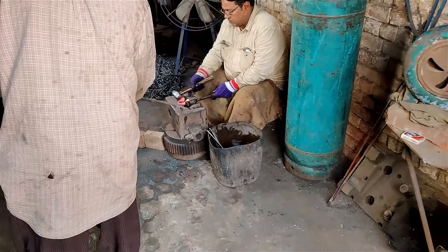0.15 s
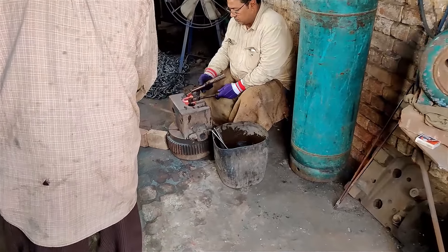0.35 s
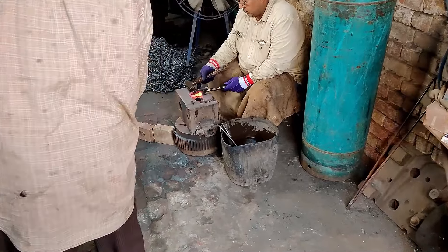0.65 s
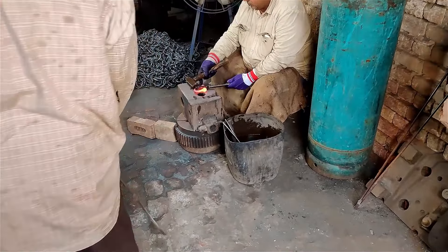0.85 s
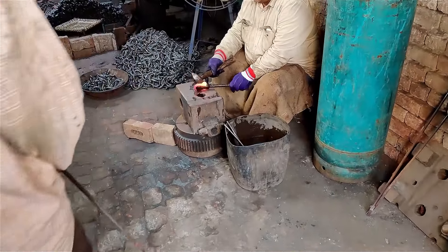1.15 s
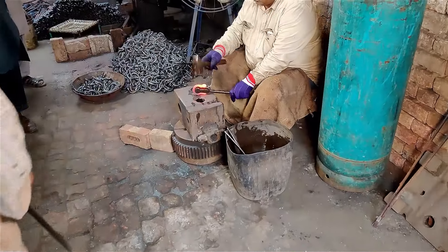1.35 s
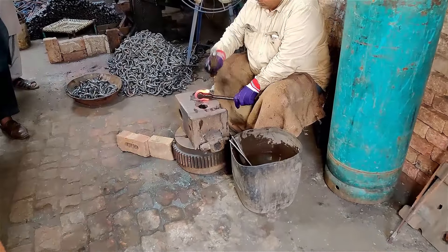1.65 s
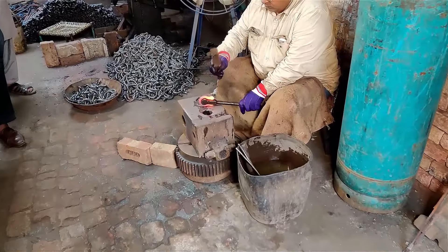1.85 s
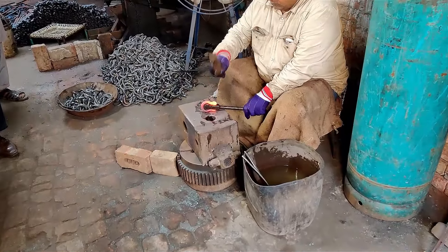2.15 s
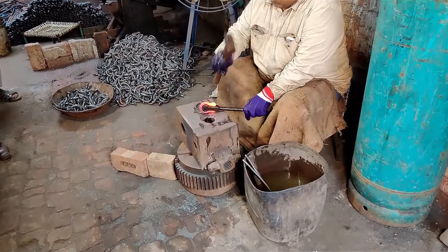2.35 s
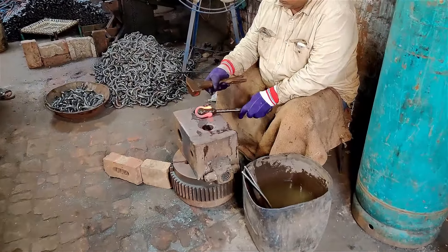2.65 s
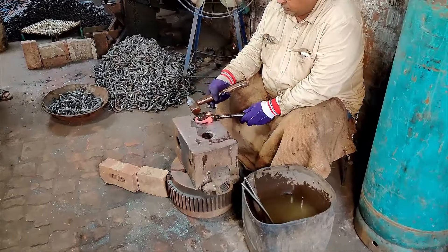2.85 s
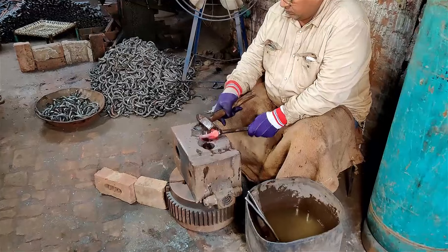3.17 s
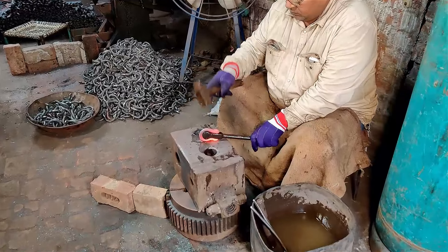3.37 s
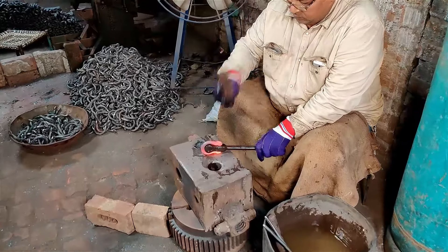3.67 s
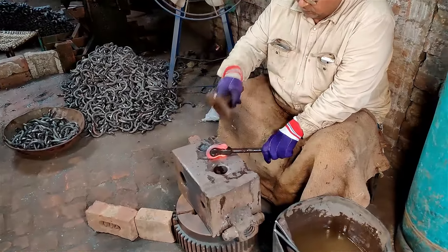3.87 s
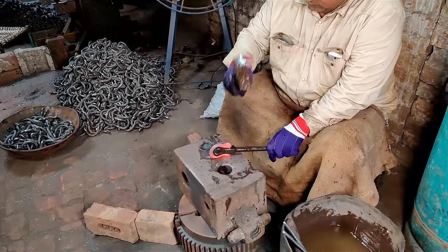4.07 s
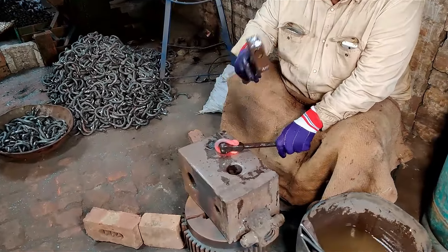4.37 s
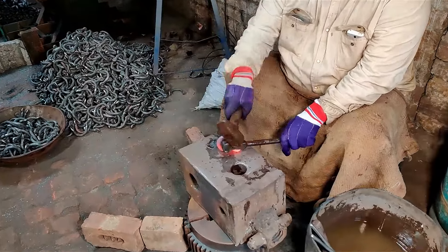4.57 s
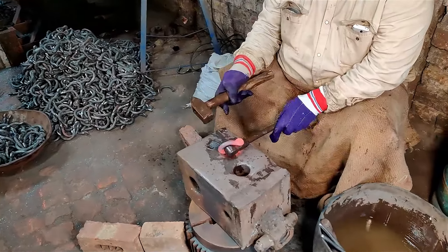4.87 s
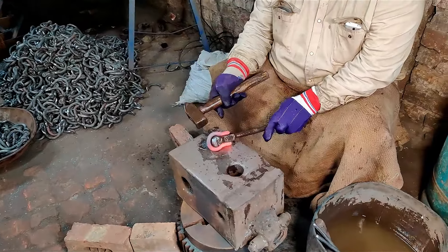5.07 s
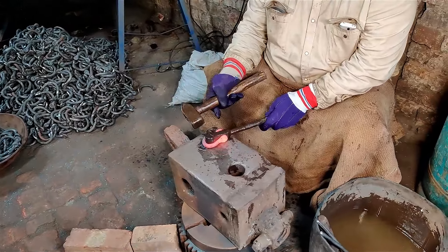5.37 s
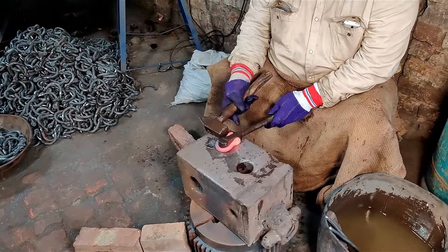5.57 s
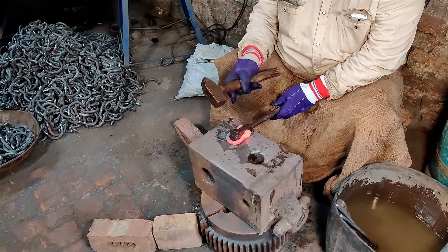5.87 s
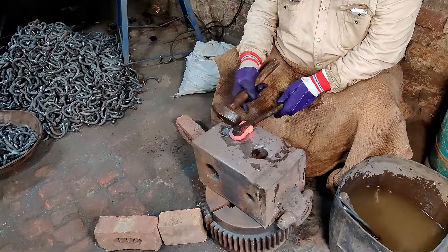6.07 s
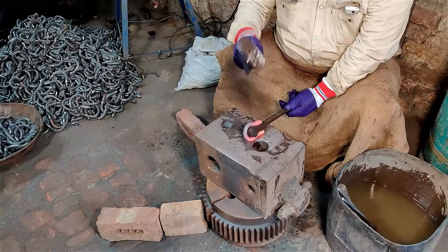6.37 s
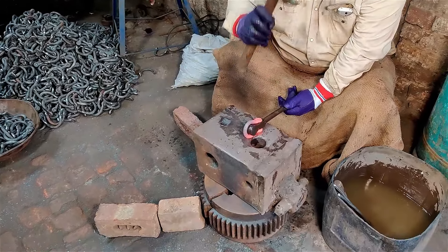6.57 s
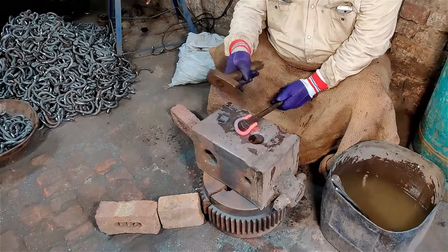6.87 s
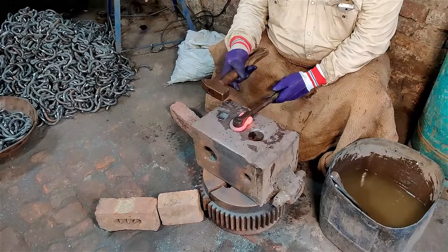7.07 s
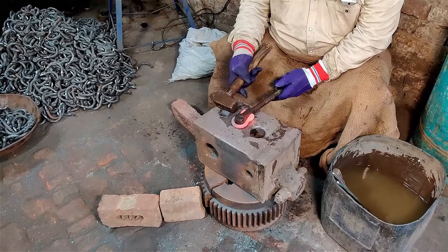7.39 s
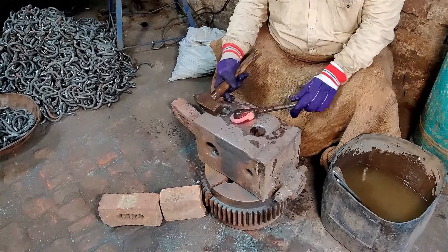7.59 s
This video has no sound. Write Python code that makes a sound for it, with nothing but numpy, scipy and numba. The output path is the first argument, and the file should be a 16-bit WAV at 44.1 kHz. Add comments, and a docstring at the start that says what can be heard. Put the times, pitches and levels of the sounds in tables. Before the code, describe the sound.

A forge blower drones and rushes in a small brick workshop while a smith strikes hot iron on an anvil and others hammer further off.

```python
"""A forge blower and its fire drone in a small brick workshop: noise booms in resonances, rushes and hisses.
The blower adds thin duct tones, a whine and a blade tone. A phone carried past it, through the room's
standing waves, comes to rest at the anvil. A smith hammers a hot link (cracks, knocks, block ring), taps
the block and makes steel squeak; soles scuff. Further off a sledge and a hand hammer strike in turn, heard as
reverberant noise and clinks. The phone ducks on sharp treble bursts and limits the drone's peaks."""
import sys
import numpy as np
from scipy import signal
from scipy.fft import rfft, irfft
from scipy.io import wavfile
from scipy.ndimage import uniform_filter1d, minimum_filter1d, map_coordinates
from numba import njit

SR = 44100
rng = np.random.default_rng(int(sys.argv[2]) if len(sys.argv) > 2 else 0)


def generate_wav(signal):
    """Clip the signal to [-1, 1] and save it as 16-bit WAV at the path in sys.argv[1]."""
    frames = np.transpose(np.atleast_2d(signal))
    scaled = np.clip(frames, -1, 1) * 32767
    pcm = np.round(scaled).astype(np.int16)
    wavfile.write(sys.argv[1], SR, pcm)


N = 340893
T = np.arange(N) / SR
FREQ = np.maximum(np.arange(N // 2 + 1) * SR / N, 1)

# Boom of forge and room, before FORGE_GAIN_DB:
# (frequency [Hz], width [Hz], level at the antinode [dB], antinode position along the path [m])
BOOM_MODES = [(47.5, 12.7, -26.5, 1.45), (67.4, 15, -28, 0.95), (84.6, 10.2, -26.5, 1.8),
              (114.8, 15.5, -29, 1.1), (140.15, 19.9, -18, 0.44), (164.4, 26, -19.5, 0.85),
              (187.1, 29, -22.5, 0.83), (205.34, 15.3, -18.5, 0.12), (226.9, 53, -24, 0.8),
              (270.8, 60, -28.5, 0.2), (324.4, 92, -31.5, 0.31)]
# Spectrum of the air and flame rush: (frequency [Hz], relative density [dB])
RUSH_SPECTRUM = [(240, -25.5), (400, -9), (470, -10.5), (600, -17), (900, -15.5), (1130, -21.5),
                 (1550, -25), (2300, -30), (3200, -34), (5000, -38.5), (7200, -40), (9000, -51),
                 (14000, -55.5), (16000, -69)]
# Resonances of duct and casing: (frequency [Hz], width [Hz], relative level [dB])
DUCT_MODES = [(738.5, 106, -0.5), (837, 104, -6.5), (1095, 79, -15.5)]
# Thin tones in the duct: (frequency [Hz], level relative to the flow [dB])
DUCT_TONE_LEVELS = [(698, -10.5), (742, -9.5), (795, -10), (850, -12)]
# Strength of the air flow: (time [s], level [dB])
FLOW_LEVEL = [(0, -35), (.42, -33), (.7, -34.5), (1.25, -35), (1.5, -34), (2.2, -37.5), (2.75, -33),
              (3.5, -37), (4.1, -35.5), (4.85, -34), (5.2, -36), (7.73, -36.5)]
# Whine of the duct: (time [s], level [dB])
WHINE_LEVEL = [(0, -51), (1.4, -38), (1.8, -42), (2.5, -34), (3.6, -46), (4.8, -41), (7.73, -39)]
# Blade tone, swelling and fading as the phone passes the blower: (time [s], level [dB])
BLADE_LEVEL = [(0, -33), (.5, -26), (.68, -30), (1, -24), (1.2, -26.5), (1.42, -20.5), (1.57, -24.5),
               (1.68, -21), (1.86, -26.5), (2.07, -23), (2.2, -33), (2.5, -33), (2.65, -27), (3.05, -29),
               (3.4, -36), (3.95, -31), (4.6, -33.5), (7.73, -38)]
# Hand hammer strokes, and at 6.972 s the near anvil's 2 kHz ring; clink pitch depends on where the work is hit:
# (time [s], clatter [dB], clink [dB], clink frequency [Hz])
HAMMER_STROKES = [(0, -35, -35, 1956), (.285, -31, -30, 2015), (.518, -27, -25, 1958),
                  (.822, -36, -31, 2010), (1.36, -31, -31, 1979), (1.887, -31, -26, 1991),
                  (2.44, -33, -35, 2006), (2.987, -34, -33, 2040), (3.548, -37, -33, 2030),
                  (4.112, -35, -27, 2008), (4.688, -32, -33, 2008), (5.256, -39, -33, 2044),
                  (5.672, -42, -35, 2100), (5.852, -31, -28, 2008), (6.437, -32, -30, 2026),
                  (6.972, -36, -32, 2029), (7.055, -31, -27, 2008), (7.662, -29, -24, 1990)]
# Clatter of the hand hammer: (frequency [Hz], width [Hz], relative level [dB])
HAMMER_MODES = [(1837, 120, -4.5), (2160, 1200, -6), (4100, 340, -12), (5140, 2400, -10),
                (5770, 330, -18.5), (7840, 640, -17.5), (12200, 4000, -26)]
# Sole scuffs on the gritty floor: (time [s], length [s], rub [dB], grit [dB])
SCUFF_EVENTS = [(0.217, 0.08, -52, -38), (0.37, 0.2, -38, -48), (1.32, 0.23, -35, -46.5),
                (1.532, 0.093, -34.5, -49), (1.667, 0.08, -33, -42), (2.173, 0.16, -33, -49),
                (3.977, 0.095, -36.5, -45), (5.943, 0.067, -34, -51)]
# Sledge strokes: (time [s], level [dB])
SLEDGE_STROKES = [(.27, -30), (1.055, -24), (2.67, -25), (3.225, -23.5), (4.36, -24.5), (4.93, -26),
                  (5.505, -20.5), (6.102, -22), (6.7, -25.5), (7.31, -24.5)]
# Ring of the sledge: (frequency [Hz], width [Hz], relative level [dB])
SLEDGE_MODES = [(1530, 980, -2), (1770, 500, 0.5), (2400, 2200, -5.5), (3150, 330, -12.5), (3690, 800, -7),
                (4910, 1500, -5), (5620, 650, -14), (7260, 3200, -11), (9200, 700, -30),
                (13200, 3000, -23.5)]
# Steel sliding on steel: (time [s], level [dB], slide length [s], frequency [Hz], ring t60 [s])
SQUEAK_EVENTS = [(0.722, -36, 0.04, 4205, .4), (3.926, -47, 0.044, 4350, .24), (5.2, -44, 0.026, 4210, .24),
                 (6.968, -33, 0.071, 4220, .24)]
# Hard blows on the hot link, before the port lean:
# (time [s], crack [dB], wall scatter [dB], knock [dB], block ring [dB], scatter and knock t60 [s])
HARD_BLOWS = [(1.773, -29.5, -31, -44, -46, 0.11), (2.0825, -18.5, -22.5, -19, -33, 0.11),
              (2.4885, -13, -17.5, -14.5, -33, 0.13), (3.7905, -11, -21.5, -21, -38, 0.15),
              (4.2135, -10.5, -16, -14.5, -34, 0.115), (4.5895, -12, -17, -10, -26, .115),
              (6.7845, -15.5, -22, -14, -30, .125)]
# Light touches of hammer and tongs on the block, before the port lean:
# (time [s], ring [dB], tick [dB], link rattle [dB])
LIGHT_TAPS = [(2.987, -35, -31, -39), (3.03, -43, -42, -45), (5.394, -45, -37, -38),
              (5.559, -33.5, -28, -42), (6.167, -29, -37, -44), (7.015, -42, -35, -54)]
# Anvil block and hammer: (frequency [Hz], width [Hz], relative level [dB])
ANVIL_MODES = [(2040, 90, -2), (4130, 70, -1.5), (4212, 35, -1), (5750, 140, -11), (6972, 35, -1),
               (7200, 35, -1), (7581, 45, -7), (9523, 50, -15), (10120, 40, -11), (10620, 60, -12),
               (13110, 60, -13), (14030, 70, -15), (14500, 70, -14)]
# Dull knock of the iron and the block's seat, and the block's modes:
# (frequency [Hz], width [Hz], relative level [dB])
KNOCK_MODES = [(670, 830, 4), (1360, 700, -8), (2060, 360, -2.5), (3010, 780, -1), (4110, 480, -1),
               (4730, 810, -4.5), (6850, 570, -2), (13000, 300, -11)]
# How the two ports face the shop: (frequency [Hz], left minus right [dB])
PORT_LEAN = [(60, -0.5), (110, 1), (200, 0.5), (380, 0), (700, -2.5), (1290, -1.0), (2380, -1), (4400, 0),
             (8120, -6.5), (15000, -8)]

PATH_M, ARRIVES_S = 0.62, 5.6
NODE_POWER_SHARE = 0.21  # power left at a standing wave's nodes
RUMBLE_DB, FORGE_GAIN_DB = -42, 4  # the gain also lifts the rumble
SURGE_DEPTH, SURGE_RATE_HZ = .035, 6  # the surging flame pulls the boom's pitch about
RUSH_GAIN_DB, HISS_GAIN_DB = 5.5, -28  # rush is relative to the flow
HISS_FOLLOW_POWER = .5
TONE_WANDER, TONE_FLICKER_DB = .012, 2.2  # multipliers of walk()
BLADE_HZ = 394.9
UPPER_RATIO, UPPER_DB = 2.01, -12  # second clink mode
CLINK_RISE_S, CLINK_T60_S, BLUR_RATE_HZ = .003, .19, 190
CATCH_SHARE = .6
CRACK_HZ, CRACK_WIDTH_HZ, CRACK_S = 3100, 9500, 0.003
BUILD_T60_S = .012  # build-up of scatter, knock and ring behind the crack
MODE_SPACING_HZ, MODE_SPREAD_DB = 110, 3  # dense high modes of hammer, tongs and link
TOP_HZ = 15800


def undb(db):
    """Decibels to gain."""
    return 10 ** (np.asarray(db) / 20)


def unit(x):
    """Scale to an rms of 1."""
    return x / np.sqrt(np.mean(x ** 2))


def curve_gain(table, x):
    """Interpolate a (position, dB) table and return gain."""
    position, db = np.transpose(table)
    return undb(np.interp(x, position, db))


def log_curve_db(table):
    """Interpolate a (Hz, dB) table over log frequency."""
    hz, db = np.transpose(table)
    return np.interp(np.log(FREQ), np.log(hz), db)


def walk(rate_hz):
    """Random levels held 1 / rate_hz and smoothed twice; spread about 1.5."""
    k = int(SR / rate_hz)
    steps = np.repeat(rng.standard_normal(N // k + 1), k)
    return 2.0 * uniform_filter1d(uniform_filter1d(steps, k), k)[:N]


def resonance(hz, width_hz):
    """Gain of a steep resonance at every frequency."""
    detune = (FREQ / hz - hz / FREQ) * hz / width_hz / 1.01
    return 1 / (1 + detune ** 2) ** 1.34


def ringing(modes):
    """Gain at every frequency of several (Hz, width, dB) resonances, summed in power."""
    return np.sqrt(sum(undb(db) ** 2 * unit(resonance(hz, width)) ** 2 for hz, width, db in modes))


def noise(gain, lag_ms=0., diffuse_hz=700):
    """Unit coloured noise at two ports: direct part late at the left, treble mostly diffuse."""
    direct, left, right = rfft(rng.standard_normal((3, N)))
    share = np.clip(0.84 / (1 + (diffuse_hz / FREQ) ** 2), 0, 1)
    late = np.exp(-2j * np.pi * FREQ * lag_ms / 1000)
    direct_ports = np.array([direct * late, direct])
    ports = np.sqrt(1 - share) * direct_ports + np.sqrt(share) * np.array([left, right])
    return unit(irfft(ports * gain, N))


def fade(t, t60):
    """Free decay, 60 dB down after t60."""
    return np.exp(-np.log(1000) * t / t60)


def waver(x, depth, rate_hz):
    """Let the pitch wander by reading the sound at an uneven speed."""
    place = np.cumsum(1 + depth * walk(rate_hz)) % N
    return np.array([map_coordinates(channel, [place], order=3, mode="nearest") for channel in x])


def add(out, start_s, sound):
    """Mix a sound in from start_s."""
    i = max(int(start_s * SR), 0)
    out[:, i:i + sound.shape[-1]] += sound[..., :max(N - i, 0)]


def forge():
    """Turbulence booms in resonances; each standing wave swells and fades as the phone moves through it."""
    out = undb(RUMBLE_DB) * noise(resonance(22, 30))
    place_m = PATH_M * np.minimum(T / ARRIVES_S, 1)
    for hz, width, db, antinode_m in BOOM_MODES:
        wave = np.cos(2 * np.pi * hz * (place_m - antinode_m) / 343)  # speed of sound [m/s]
        standing = np.sqrt(NODE_POWER_SHARE + (1 - NODE_POWER_SHARE) * wave ** 2)
        out = out + undb(db) * standing * noise(resonance(hz, width), lag_ms=0.23, diffuse_hz=750)
    return waver(out, SURGE_DEPTH, SURGE_RATE_HZ)


def duct_tones():
    """Eddies lock onto the duct's resonances: thin tones that waver in pitch and level."""
    out = np.zeros((2, N))
    for hz, db in DUCT_TONE_LEVELS:
        phase = 2 * np.pi * np.cumsum(hz * (1 + TONE_WANDER * walk(12))) / SR
        left_lag_rad = 1.34 + 0.66 * walk(3.6)
        flicker = undb(TONE_FLICKER_DB * walk(9))
        out += undb(db) * unit(flicker * np.sin([phase - left_lag_rad, phase]))
    return out


def blade_tone():
    """The blades hum at a wandering pitch, with a weaker partial a fifth above."""
    # blower on the right: the left port lags [rad]
    left_lag_rad = np.array([[.9], [0]])
    phase = 2 * np.pi * np.cumsum(BLADE_HZ * (1 + 0.0039 * walk(14))) / SR - left_lag_rad
    throb = undb(.9 * walk(18))
    tone = curve_gain(BLADE_LEVEL, T) * np.sqrt(2) * throb * np.sin(phase)
    overtone = undb(-42.0 + 2 * walk(5.5)) * np.sin(1.5 * phase)
    return tone + overtone


def blower():
    """Air flow drives the duct's rush and tones and, less, the outlet's hiss; whine and blade tone are added."""
    flow = curve_gain(FLOW_LEVEL, T)
    low_cut = 1 / (1 + (300 / FREQ) ** 4)
    air = noise(undb(log_curve_db(RUSH_SPECTRUM)) * low_cut, lag_ms=0.44, diffuse_hz=830)
    hiss = irfft(rfft(air) / (1 + (1800 / FREQ) ** 4), N)
    duct = waver(noise(ringing(DUCT_MODES), lag_ms=0.23, diffuse_hz=1060), depth=.012, rate_hz=6)
    gusts = undb(.8 * walk(14))
    rush = (air - hiss + undb(-5) * duct) * undb(RUSH_GAIN_DB) * gusts
    whine_gain = curve_gain(WHINE_LEVEL, T) * undb(walk(7.9))
    whine = whine_gain * noise(resonance(1387, 350), lag_ms=0.43, diffuse_hz=2200)
    flutter = undb(.4 * walk(20))
    outlet = hiss * flutter * undb(HISS_GAIN_DB) * (flow / flow.mean()) ** HISS_FOLLOW_POWER
    return flow * (rush + duct_tones()) + outlet + whine + blade_tone()


def far_blows(blows, modes, rise_s, t60, clatter_db):
    """Far blows arrive as reverberation only: a soft front and a ringing, clattering tail."""
    swell, t = np.zeros((1, N)), T[:SR]
    for start_s, db, *_ in blows:
        add(swell, start_s, undb(db) * (1 - np.exp(-t / rise_s)) * fade(t, t60))
    return swell * undb(clatter_db * walk(160)) * noise(ringing(modes))


def clinks():
    """Struck work (at 6.972 s the near anvil) rings in two modes, blurred by the room, each at its own pitch."""
    out, t = np.zeros((2, N)), T[:SR // 2]
    blur = unit(np.array([walk(BLUR_RATE_HZ), walk(BLUR_RATE_HZ)]))
    swell = (1 - np.exp(-t / CLINK_RISE_S)) * fade(t, CLINK_T60_S)
    for start_s, _, db, hz in HAMMER_STROKES:
        drift = blur[:, (int(start_s * SR) + np.arange(len(t))) % N]
        phase = 2 * np.pi * (hz * t + rng.random((2, 1))) + .9 * drift
        modes = np.sin(phase) + undb(UPPER_DB) * np.sin(UPPER_RATIO * phase)
        # each port's level flickers with the other port's drift
        add(out, start_s, undb(db + 4.6 * drift[::-1]) * swell * modes)
    return out


def hand_hammer():
    """Each row, far strokes and the one near ring, gives a quick-rising noise clatter and a tonal clink."""
    clatter = far_blows(HAMMER_STROKES, HAMMER_MODES, rise_s=0.0023, t60=0.3, clatter_db=0.5)
    return clatter + clinks()


def scuffs():
    """A sliding sole rubs in uneven swells and crunches fine grit."""
    out = np.zeros((2, N))
    rub = noise(resonance(1150, 2500)) * undb(1.4 * walk(60))
    grit = unit(noise(resonance(4000, 11000)) * undb(1.0 * walk(400)))
    for start_s, length_s, rub_db, grit_db in SCUFF_EVENTS:
        swell = np.sin(np.linspace(0, np.pi, int(length_s * SR)))
        part = int(start_s * SR) + np.arange(len(swell))
        add(out, start_s, swell * (undb(rub_db) * rub[:, part] + undb(grit_db) * grit[:, part]))
    return out


def sledge():
    """The far sledge rings broad, slower-rising resonances."""
    return far_blows(SLEDGE_STROKES, SLEDGE_MODES, rise_s=0.01, t60=0.3, clatter_db=-0.15)


def squeaks():
    """Sliding steel drives one mode of the tool: it catches at once, swells, then rings out."""
    out, t = np.zeros((2, N)), T[:SR // 4]
    for start_s, db, length_s, hz, t60 in SQUEAK_EVENTS:
        slide = np.sin(np.pi * np.minimum(t / length_s, 1)) ** 2
        swell = slide + CATCH_SHARE * fade(t, t60)
        jitter = 0.019 * np.cumsum(rng.standard_normal((2, len(t))), axis=-1)
        add(out, start_s, undb(db) * swell * np.sin(2 * np.pi * hz * t + jitter))
    return out


def smith():
    """Blows crack, knock, ring the block and scatter off the walls; taps tick, ring and rattle the link."""
    out, t = np.zeros((2, N)), T[:SR // 3]
    grid = np.arange(0, SR / 2, MODE_SPACING_HZ)
    high_modes = undb(np.interp(FREQ, grid, MODE_SPREAD_DB * rng.standard_normal(len(grid))))
    tilt = FREQ / (FREQ + 1500) / np.sqrt(1 + (FREQ / 6000) ** 2)
    bright = noise(high_modes * tilt, diffuse_hz=1480)
    snap = noise(resonance(CRACK_HZ, CRACK_WIDTH_HZ))[0]
    dull = noise(ringing(KNOCK_MODES), diffuse_hz=1210)
    # narrow noise bands at the block's modes make a rough metallic ring
    steel = noise(ringing(ANVIL_MODES))
    clumps = undb(1.4 * walk(300))  # early reflections come in clumps
    # a loose link chatters in many tiny contacts
    chatter = unit(noise(resonance(5200, 9000)) * undb(3 * walk(500)))
    for start_s, crack_db, scatter_db, knock_db, ring_db, t60 in HARD_BLOWS:
        part = int(start_s * SR) + np.arange(len(t))
        # direct from the anvil: same crack at both ports
        crack = snap[part] * np.exp(-(t / CRACK_S) ** 2)
        crack = undb(crack_db) * crack / crack[:int(CRACK_S * SR)].std()
        clank = undb(scatter_db) * bright[:, part] + undb(knock_db) * dull[:, part]
        clank = clank * clumps[part] * fade(t, t60)
        # the block rings on softly under the blow
        ring = undb(ring_db) * steel[:, part] * fade(t, 0.3)
        add(out, start_s, crack + (clank + ring) * (1 - fade(t, BUILD_T60_S)))
    for start_s, ring_db, tick_db, rattle_db in LIGHT_TAPS:
        part = int(start_s * SR) + np.arange(len(t))
        ring = undb(ring_db) * steel[:, part] * fade(t, 0.24)
        tick = undb(tick_db) * bright[:, part] * fade(t, 0.019)
        rattle = undb(rattle_db) * chatter[:, part] * fade(t, 0.089)
        add(out, start_s, ring + tick + rattle)
    return out * undb(np.array([[-.5], [.5]]))  # left, right [dB]


def scene():
    """Forge, blower, hand hammer and sledge get the ports' frequency-dependent lean; the rest do not."""
    shop = undb(FORGE_GAIN_DB) * forge() + blower() + hand_hammer() + sledge()
    lean_db = log_curve_db(PORT_LEAN)
    port_gain = undb(np.array([lean_db, -lean_db]) / 2)
    return irfft(rfft(shop) * port_gain, N) + scuffs() + squeaks() + smith()


@njit
def recover(gain, step):
    """A gain that falls at once and climbs back gradually."""
    out, g = np.empty(len(gain)), 1.
    for i in range(len(gain)):
        g = min(gain[i], g + (1 - g) * step)
        out[i] = g
    return out


def limit(x, sensed, ceiling_db, hold_s, release_s):
    """Look-ahead limiter: the gain drops just before a peak, holds, then recovers."""
    need = np.minimum(1, undb(ceiling_db) / (np.abs(sensed).max(axis=0) + 1e-9))
    half, ahead = int(hold_s * SR / 2), SR // 400
    held = minimum_filter1d(need, 2 * half + 1, origin=half)
    gain = minimum_filter1d(recover(held, 1 / (release_s * SR)), 2 * ahead)
    return x * uniform_filter1d(gain, ahead)


def record(dry):
    """The phone ducks on sharp treble bursts, limits the drone's peaks and cuts the top."""
    treble = signal.sosfilt(signal.butter(2, 1500, "high", fs=SR, output="sos"), dry)
    burst = np.sqrt(np.abs(uniform_filter1d(treble ** 2, size=150)))
    ducked = limit(dry, burst, ceiling_db=-20, hold_s=.07, release_s=.025)
    held = limit(ducked, ducked, ceiling_db=-8.5, hold_s=0.0016, release_s=0.067)
    return signal.sosfilt(signal.ellip(8, .2, 70, TOP_HZ, fs=SR, output="sos"), held)


dry = scene()
out = record(dry)
generate_wav(out)
```